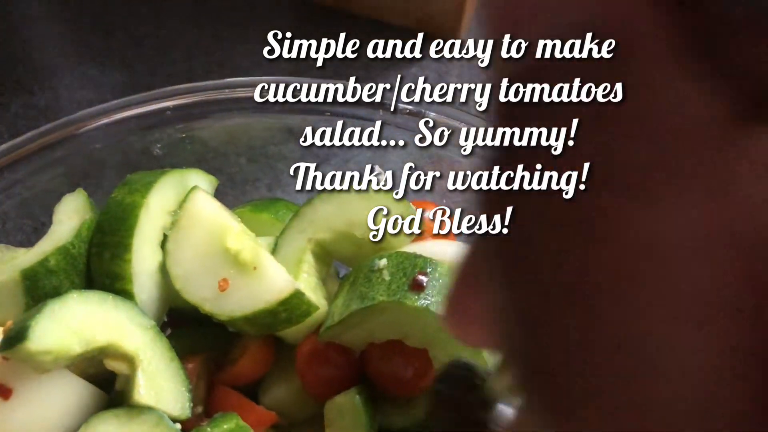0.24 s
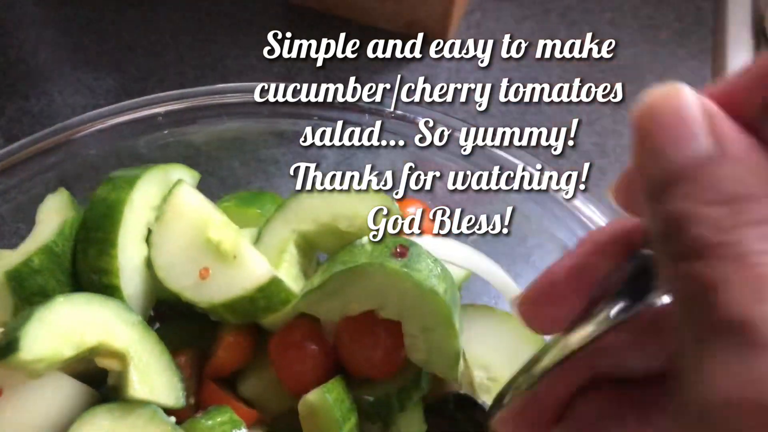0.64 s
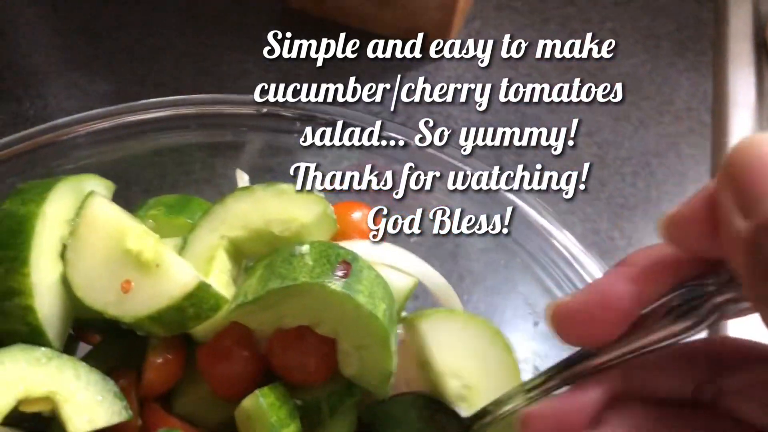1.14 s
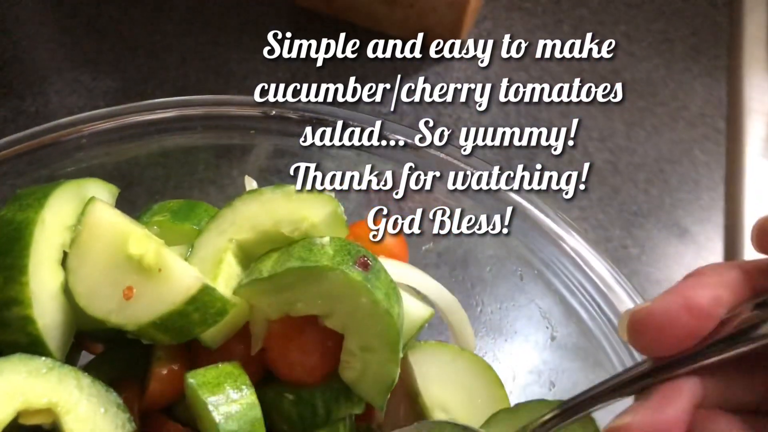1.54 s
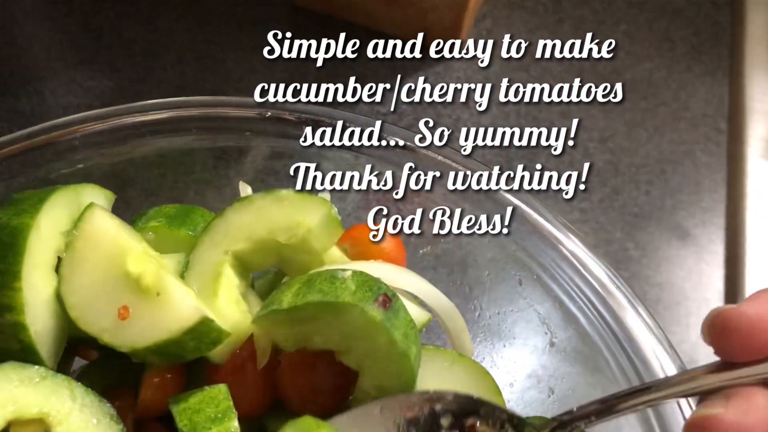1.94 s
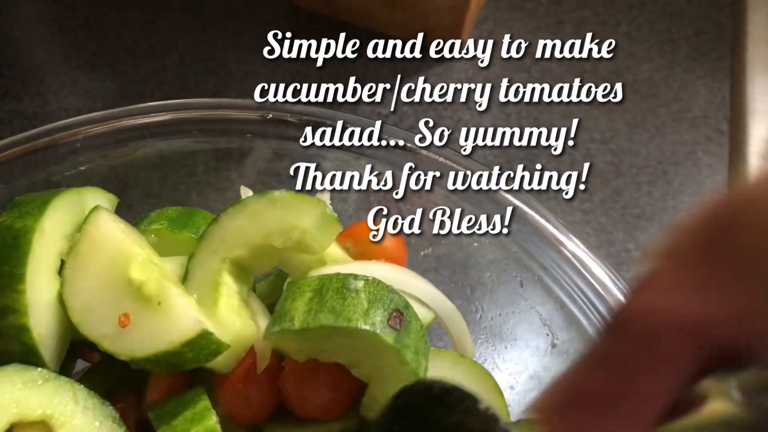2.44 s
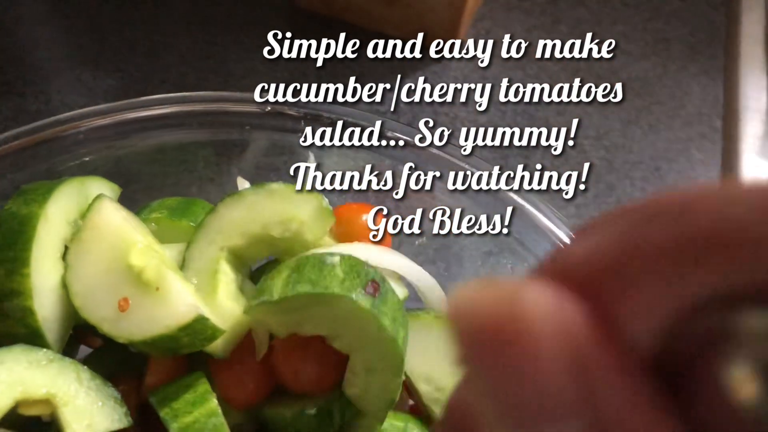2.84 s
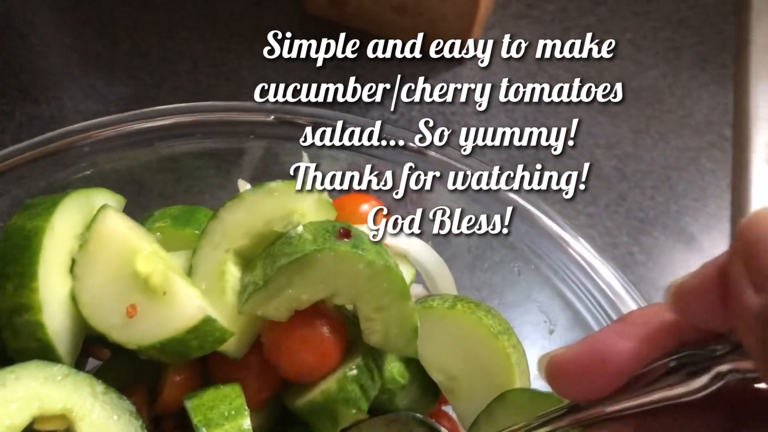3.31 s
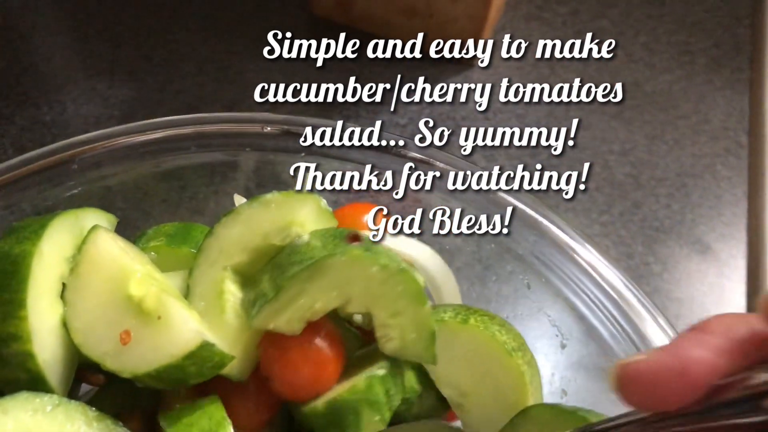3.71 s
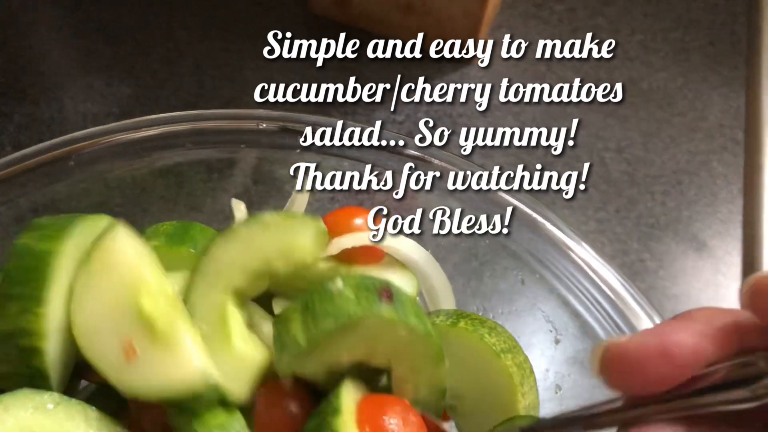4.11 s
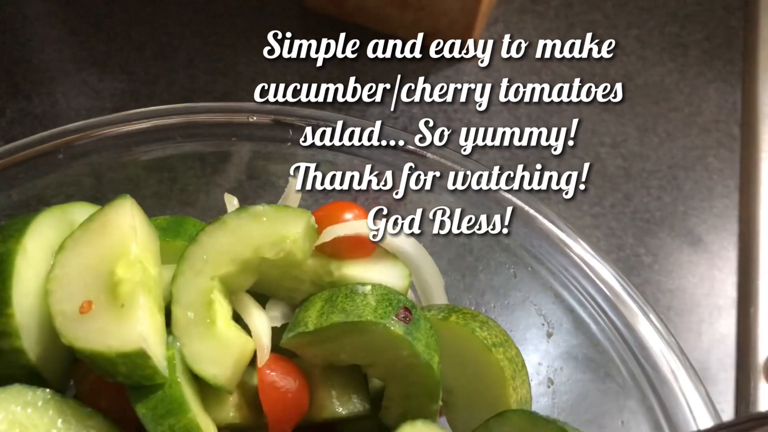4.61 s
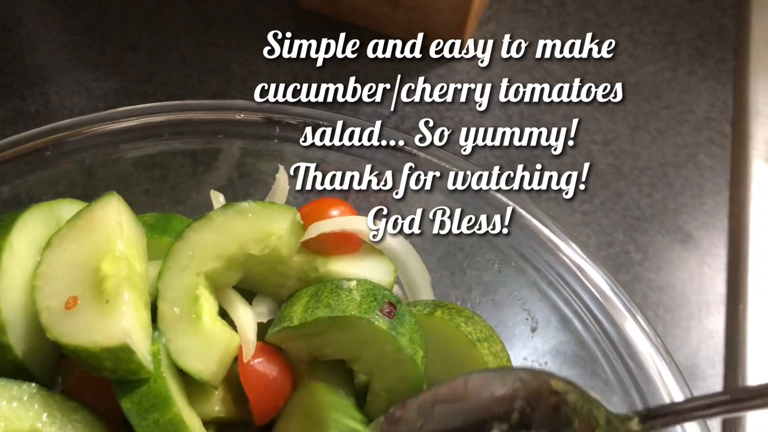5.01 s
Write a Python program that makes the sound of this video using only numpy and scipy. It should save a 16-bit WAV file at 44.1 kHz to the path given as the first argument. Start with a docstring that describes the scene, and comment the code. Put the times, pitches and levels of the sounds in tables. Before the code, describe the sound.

Two sharp, quickly damped spoon-on-glass clanks, about two and a half seconds apart, among faint ticks, wet rustles and soft motor hum.

```python
"""A low kitchen hum and faint ticks, then a steel spoon strikes a glass salad bowl hard, close to a phone.
It strikes hard once more; around the blows it taps, scrapes and squeaks, amid short clicks, knocks and rustles.
Glass, spoon and counter are sums of decaying sine modes; grit, clicks and rustles are shaped noise.
The kitchen answers with a brief diffuse echo, over room air and a wavering motor hum."""
import sys
import numpy as np
from scipy import signal
from scipy.fft import rfft, irfft
from scipy.io import wavfile
from scipy.ndimage import uniform_filter1d

SR = 44100
rng = np.random.default_rng(int(sys.argv[2]) if len(sys.argv) > 2 else 0)


def store_wav(level_fs):
    """Save 16-bit WAV to argv[1]."""
    pcm = np.round(np.clip(np.atleast_2d(level_fs), -1, 1) * 32767)
    wavfile.write(sys.argv[1], SR, pcm.T.astype(np.int16))


N = 231828


def undb(db):
    """Gain of a dB value."""
    return 10 ** (np.asarray(db) / 20)


def unit(x):
    """Scale to rms 1."""
    return x / np.sqrt(np.mean(x ** 2))


def shaped(x, gain):
    """Filter by a gain given as a function of frequency."""
    f = np.maximum(np.fft.rfftfreq(len(x), 1 / SR), 1)
    return irfft(rfft(x) * gain(f), len(x))


def hump(f, hz, octaves):
    """Bell curve on a log-frequency axis."""
    return np.exp(-.5 * (np.log2(f / hz) / octaves) ** 2)


def decay(t, t60):
    """Exponential fade that falls 60 dB in t60 seconds."""
    return np.exp(-np.log(1000) * t / t60)


def ring(hz, t60, db, size):
    """Sum of decaying modes; neighbours start in opposite senses."""
    t = np.arange(size)[:, None] / SR
    sense = (-1) ** np.arange(len(hz))
    return np.sum(sense * undb(db) * decay(t, t60) * np.sin(2 * np.pi * hz * t), axis=1)


def add(out, s, x):
    """Mix x into out from time s."""
    i = int(s * SR)
    out[i:i + len(x)] += x[:N - i]


def walk(rate):
    """Random levels held 1 / rate s and slewed twice; spread 1."""
    hold = int(SR / rate)
    steps = np.repeat(rng.standard_normal(N // hold + 1), hold)
    return unit(uniform_filter1d(uniform_filter1d(steps, hold), hold)[:N])


def swell(length, rise):
    """Envelope of one stroke: from half height up over a share of it, then down."""
    t = np.arange(int(length * SR)) / SR
    return np.interp(t, [0, rise * length, 0.88 * length, length], [0.48, 0.96, .6, 0.048])


# hard blows and their bounces: start_s, level_db, place (0 wall - 1 rim), crack_db, shove_db (into the counter)
BLOWS = [(0.473, -6.5, 0.2, -11, -19), (0.4778, -21.5, 0.3, -21, -35.5), (2.9687, -10, 1, -10.5, -22),
         (2.9708, -24.5, 0.84, -11, -32)]
# bowl modes, damped by the salad: pitch_hz
BOWL_HZ = [1110, 1020, 2150, 2320, 3430, 3810, 4480, 5030, 5610, 5790, 6910, 7430, 7950, 8500, 9270, 9500,
           10120, 10900, 11900, 13300, 13700, 15300]
# each bowl mode when the wall is struck: level_db
WALL_DB = [-4.5, -20, -4.5, 6, -4.5, -18.5, -5, -8, -17, -10.5, -13.5, -9, -5, -11, -8.5, -15, -24, -11.5,
           -19, -21, -20, -24]
# each bowl mode when struck near the rim: level_db
RIM_DB = [-12.5, -0.5, 1, -13.5, -6.5, -4, -14, -23.5, -6.5, -13.5, -14.5, 1.5, -10, -7.5, -18.5, -5, -10.5,
          -15.5, -21.5, -13.5, -17, -4]
WALL_T60_S, RIM_T60_S = 0.015, .016
# the loaded bowl rocks first; THUD_DB is relative to the shove
THUD_HZ, THUD_T60_S, THUD_LATE_S, THUD_DB = 590.8, 0.012, .003, 0
SHOVE_LATE_S = 0.0082


def blows():
    """Bowl modes weighted by the place struck, over a crack of noise; the counter answers later."""
    glass, counter = np.zeros(N), np.zeros(N)
    hz, wall_db, rim_db = np.array([BOWL_HZ, WALL_DB, RIM_DB])
    t = np.arange(2000) / SR
    for s, db, place, crack_db, shove_db in BLOWS:
        t60 = (1 - place) * WALL_T60_S + place * RIM_T60_S
        mode_db = (1 - place) * wall_db + place * rim_db
        add(glass, s, ring(hz, t60, db + mode_db, size=6000))
        # countless short modes, heard as a burst of noise
        crack = unit(shaped(rng.standard_normal(len(t)), lambda f: hump(f, 4500, 1.7)))
        add(glass, s, undb(crack_db) * crack * np.exp(-t / 0.0024))
        thud = ring(np.array([THUD_HZ]), THUD_T60_S, shove_db + THUD_DB, size=3000)
        add(counter, s + THUD_LATE_S, thud)
        add(counter, s + SHOVE_LATE_S, undb(shove_db) * shove(size=16000))
    return glass, counter


# modes of the counter top under the bowl: pitch_hz, t60_s, level_db
COUNTER = [(62.6, .2, -11.5), (106.7, 0.11, -11), (167, 0.19, -1), (241, 0.13, -6), (324.4, 0.12, -6),
           (443, 0.089, -8.5), (690, 0.096, -7.5)]


def shove(size):
    """The counter top's modes and rumble; the heavy top takes time to get moving."""
    t = np.arange(size) / SR
    rumble = unit(shaped(rng.standard_normal(size), lambda f: hump(f, 400, 1.0)))
    modes = ring(*np.transpose(COUNTER), size=size)
    onset = 1 - np.exp(-t / 0.0055)
    return (modes + undb(-6.5) * rumble * np.exp(-t / 0.025)) * onset


# soft shifts of the bowl on the counter: start_s, level_db
NUDGES = [(.385, -41.5), (0.959, -49.5), (1.55, -51), (2.351, -51), (2.724, -43.5), (2.77, -48)]


def nudges():
    """The bowl shifts softly and sets the counter top ringing without a blow."""
    out = np.zeros(N)
    for s, db in NUDGES:
        add(out, s, undb(db) * shove(size=16000))
    return out


# the spoon's modes: pitch_hz, t60_s (when dragged; taps die sooner), level_db
SPOON = [(2220, .04, -10), (3440, .05, -8), (3970, .04, -6), (5870, .06, -6), (7310, .06, -1),
         (9280, .05, -6), (10300, .05, -4), (11050, .04, -4), (13850, .04, -4), (15420, .05, -1)]
# light taps of the spoon: start_s, peak_db (of the ring), strongest_hz
TAPS = [(0.047, -53.5, 14000), (.27, -50, 14000), (.31, -54, 13800), (.392, -36, 15400),
        (0.451, -47.5, 7450), (.46, -40, 9100), (1.121, -56, 14600), (1.138, -56, 14600),
        (1.184, -55, 6000), (1.217, -48, 10300), (1.339, -45, 11050), (1.35, -50, 11050),
        (1.354, -57, 11150), (1.363, -48.5, 11050), (1.379, -39, 7200), (1.388, -32.5, 7260),
        (2.7258, -41, 15400), (2.742, -50, 9570), (2.921, -48, 15600), (2.935, -43, 15400),
        (2.949, -33.5, 5900), (3.425, -55, 10300), (3.698, -55, 10300), (3.792, -37.5, 10350),
        (4.24, -54, 13870), (4.52, -52.5, 10360)]
TAP_TICK_DB, TAP_TICK_S = -8.5, .0012  # broad tick of the contact, rms before its fade, against the ring's peak


def spoon_taps():
    """Taps wake the spoon's modes, favouring those near the contact's own pitch, with a broad tick."""
    out = np.zeros(N)
    hz, t60, mode_db = np.transpose(SPOON)
    t = np.arange(5000) / SR
    for s, db, near_hz in TAPS:
        scatter_db = 3 * rng.standard_normal(len(hz))
        tap = ring(hz, 0.45 * t60, mode_db + 8 * hump(hz, near_hz, 0.1) + scatter_db, size=len(t))
        tick = unit(shaped(rng.standard_normal(len(t)), lambda f: hump(f, 3700, 1.1)))
        tick *= undb(TAP_TICK_DB) * np.exp(-t / TAP_TICK_S)
        add(out, s, undb(db) * (tap / np.max(np.abs(tap)) + tick))
    return out


def stick_slip():
    """Noise of the dragged edge, its level wandering with uneven stick and slip."""
    return rng.standard_normal(N) * undb(4 * walk(150))


def spoon_body(near_hz, octaves):
    """Ring of the spoon under a drag, its modes lifted by up to 36 dB around the contact's pitch."""
    hz, t60, mode_db = np.transpose(SPOON)
    return ring(hz, t60, mode_db + 36 * hump(hz, near_hz, octaves), size=5000)


# spoon edge dragged over the glass: start_s, length_s, grit_db, strongest_hz
SCRAPES = [(.026, .052, -75, 11100), (1.185, 0.055, -64, 5880), (1.38, 0.043, -63, 9240),
           (1.66, .11, -74, 12000), (2.438, .041, -66, 11020), (2.723, .047, -62, 14300),
           (2.918, .039, -50, 15200), (3.625, 0.094, -74, 10300), (3.729, 0.12, -63.5, 11970),
           (3.876, 0.106, -73, 10200), (4.373, .16, -74, 12580), (5.209, .048, -76, 11020)]
# the spoon's ring against the grit; longer drags ring more
SCRAPE_RING_DB, RING_DB_PER_S, SCRAPE_SPREAD_OCT = -18, 68.5, .75


def spoon_scrapes(slip):
    """Stick-slip noise heard directly as grit and through the ringing spoon."""
    out = np.zeros(N)
    grit = unit(shaped(slip, lambda f: hump(f, 9000, 1.0)))
    for s, length, db, near_hz in SCRAPES:
        i = int(s * SR)
        shape = swell(length, 0.19)[:N - i]
        stroke = slice(i, i + len(shape))
        rung = signal.fftconvolve(slip[stroke] * shape, spoon_body(near_hz, SCRAPE_SPREAD_OCT))
        add(out, s, undb(db + SCRAPE_RING_DB + RING_DB_PER_S * length) * unit(rung))
        add(out, s, undb(db) * shape * grit[stroke])
    return out


# steady drags that make one spoon mode sing: start_s, length_s, level_db, near_hz
SQUEAKS = [(0.382, 0.051, -69, 11050), (4.355, .19, -78, 5810), (4.48, 0.19, -67, 3430)]
SQUEAK_SPREAD_OCT, SQUEAK_ROUGH = .05, .6


def spoon_squeaks(slip):
    """A steady drag slips in step with the nearest spoon mode, and that mode sings."""
    out = np.zeros(N)
    hz = np.transpose(SPOON)[0]
    for s, length, db, near_hz in SQUEAKS:
        i, shape = int(s * SR), swell(length, 0.15)
        mode_hz = hz[np.argmin(np.abs(hz - near_hz))]
        locked = np.sin(2 * np.pi * mode_hz * np.arange(len(shape)) / SR)
        drive = (SQUEAK_ROUGH * slip[i:i + len(shape)] + 0.019 * locked) * shape
        sung = signal.fftconvolve(drive, spoon_body(near_hz, SQUEAK_SPREAD_OCT))
        add(out, s, undb(db) * unit(sung))
    return out


# short clicks and knocks (wet slices, or light clinks on the bowl): start_s, peak_db, centre_hz
CLICKS = [(.091, -53, 5000), (0.272, -57, 5850), (.381, -32, 1220), (.382, -37, 3930), (.385, -56, 10000),
          (.394, -37, 4010), (1.219, -43, 5500), (1.427, -37, 13450), (1.431, -37, 4700),
          (1.468, -52, 5500), (1.473, -48.5, 12970), (1.516, -52, 11000), (1.737, -36.5, 9940),
          (1.839, -52.5, 10640), (2.44, -36.5, 10520), (2.753, -49, 4970), (2.948, -22.5, 2997),
          (2.963, -31, 6000), (3.09, -38, 9500), (3.159, -45, 13000), (3.247, -53, 10020),
          (3.34, -30.5, 8920), (3.383, -48.5, 10000), (3.611, -45.5, 13240), (3.796, -45, 4000),
          (4.09, -40.5, 9900), (4.195, -37, 15000), (4.837, -37, 9000), (4.838, -46.5, 2970),
          (4.901, -41, 3400), (5.014, -41.5, 5600), (5.128, -40, 12700), (5.131, -39.5, 3220),
          (5.199, -46, 12030)]
# faint clicks: the quietest peak, and the mean excess over it
FAINT_CLICKS_PER_S, FAINT_DB, FAINT_SCATTER_DB = 13, -66.5, 3
CLICK_DECAY_S = .0012  # at 10 kHz; deeper clicks last longer by the power below
CLICK_DEEPER_POWER, CLICK_SPREAD_OCT = .45, .36


def clicks():
    """Clicks and knocks as short noise bursts with a sharp first break, and a scatter of fainter ones."""
    out = np.zeros(N)
    when, loud, high = rng.random((3, int(FAINT_CLICKS_PER_S * N / SR)))
    faint = np.c_[when * N / SR, FAINT_DB - FAINT_SCATTER_DB * np.log(loud), 6000 * 2.5 ** high]
    t = np.arange(-128, 640) / SR  # lead-in leaves room for the filter's spread
    for s, db, hz in np.r_[np.array(CLICKS), faint]:
        noise = rng.standard_normal(len(t))
        noise[128] = 3.5  # the sharp first break
        fade_s = CLICK_DECAY_S * (1e4 / hz) ** CLICK_DEEPER_POWER
        burst = noise * (t >= 0) * np.exp(-np.abs(t) / fade_s)
        snap = shaped(burst, lambda f: hump(f, hz, CLICK_SPREAD_OCT) + 0.08 * hump(f, 6000, 1.5))
        add(out, max(s + t[0], 0), undb(db) * snap / np.max(np.abs(snap)))
    return out


# a soft broad rustle around the first blow, then salad sliding on the glass: start_s, length_s, level_db, centre_hz
RUSTLES = [(.36, 0.22, -57, 3870), (.731, 0.18, -55, 1090), (.751, 0.21, -70.5, 6000),
           (1.106, 0.045, -66, 3500), (2.706, .077, -61.5, 1500), (2.801, .26, -71, 4000)]
# thin, high hiss of a wet film: start_s, length_s, level_db, centre_hz
HISSES = [(.776, .072, -76, 11700), (.828, .2, -73.5, 10960), (.855, 0.2, -75, 13300),
          (1.004, 0.16, -72.5, 11500), (2.777, .17, -69, 11150)]
RUSTLE_SPREAD_OCT, HISS_SPREAD_OCT = 1, 0.079


def rustles():
    """Patchy noise swelling and fading, each stroke in its own band: broad rustles and narrow hisses."""
    out = np.zeros(N)
    rub = rng.standard_normal(N) * undb(2.5 * walk(40))
    for strokes, octaves in ((RUSTLES, RUSTLE_SPREAD_OCT), (HISSES, HISS_SPREAD_OCT)):
        for s, length, db, hz in strokes:
            i, shape = int(s * SR), swell(length, .3)
            rustle = unit(shaped(rub[i:i + len(shape)], lambda f: hump(f, hz, octaves)))
            add(out, s, undb(db) * shape * rustle)
    return out


# bands of the kitchen echo: centre_hz, t60_s, level_db
ROOM = [(121, .3, -3), (260, 0.92, -2), (463, 0.94, 0), (980, 0.57, -1.5), (2120, 0.48, -1),
        (4260, 0.52, 0), (8100, 0.42, -6.5), (13880, 0.19, 3)]
ROOM_DB, FIRST_WALL_S = -14.5, .011
COUNTER_ECHO_DB = 0  # the counter's share of the echo


def kitchen(x):
    """Diffuse echo, each band dying at its own rate; thin until the first wall answers."""
    t = np.arange(30000) / SR
    tail = np.zeros(len(t))
    for hz, t60, db in ROOM:
        band = shaped(rng.standard_normal(len(t)), lambda f: hump(f, hz, 0.51))
        tail += undb(db) * decay(t, t60) * band
    tail *= np.interp(t, [0, FIRST_WALL_S, FIRST_WALL_S + 0.00067], [0, .3, 1])
    return undb(ROOM_DB) * signal.fftconvolve(x, tail / np.sqrt(np.sum(tail ** 2)))[:N]


# spectrum of the room air, before the resonances: pitch_hz, level_db (per Hz, relative)
AIR = [(22, -40.5), (40, -16), (60, -6), (115, -8.5), (300, -15), (620, -18), (1400, -20), (2600, -26.5),
       (3000, -31), (4200, -35.5), (7700, -42.5), (8300, -43), (12000, -49), (16500, -47)]
# room resonances lifting the air: pitch_hz, width_hz, lift_db
BOOM = [(70, 7.2, 0), (108.3, 19, 9.5), (168, 12, 3), (230.5, 3.3, 6), (312.5, 14, 9), (362, 36, 8),
        (417, 53, 6.5)]
AIR_DB = -53.5


def room_air():
    """Noise coloured by the room's booming resonances, its bands drifting in level one by one."""
    hz, db = np.transpose(AIR)

    def colour(f):
        boom_db = sum(lift_db / (1 + (2 * (f - mid_hz) / width) ** 2) for mid_hz, width, lift_db in BOOM)
        return undb(np.interp(np.log(f), np.log(hz), db) + boom_db)
    steady = shaped(rng.standard_normal(N), colour)
    air = np.zeros(N)
    for mid_hz in 32 * 2. ** np.arange(10):
        air += undb(1.0 * walk(4.9)) * shaped(steady, lambda f: hump(f, mid_hz, 0.99))
    return undb(AIR_DB) * unit(air)


HUM_HZ, HUM_DB = 186, -59  # centre pitch and level


def motor_hum():
    """A sine whose pitch and level waver at random."""
    pitch_hz = HUM_HZ + 1.5 * walk(6)
    return np.sin(2 * np.pi * np.cumsum(pitch_hz) / SR) * undb(HUM_DB + 3 * walk(7))


def scene():
    """Near sounds, their echo and the background."""
    glass, counter = blows()
    counter += nudges()
    slip = stick_slip()
    spoon = spoon_taps() + spoon_scrapes(slip) + spoon_squeaks(slip)
    near = glass + spoon + clicks() + rustles()
    echo = kitchen(near + undb(COUNTER_ECHO_DB) * counter)
    return (near + counter + echo + room_air() + motor_hum())[None]


TOP_HZ = 15950


def record(dry):
    """The phone drops the deepest bass, rounds the loudest peaks and cuts the top."""
    dry = signal.sosfilt(signal.butter(2, 35, "high", fs=SR, output="sos"), dry)
    dry = .95 * np.tanh(dry / .95)
    return signal.sosfilt(signal.ellip(12, .3, 90, TOP_HZ, fs=SR, output="sos"), dry)


dry = scene()
out = record(dry)
store_wav(out)
```